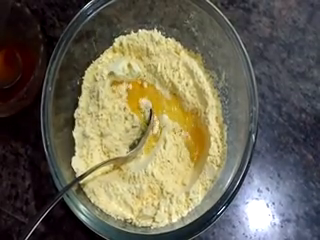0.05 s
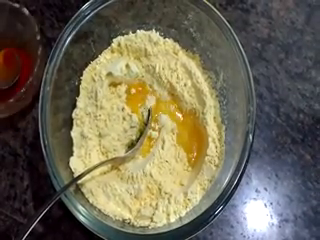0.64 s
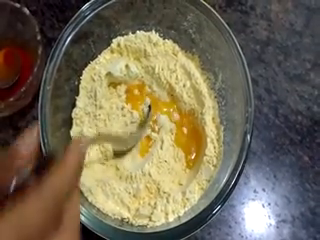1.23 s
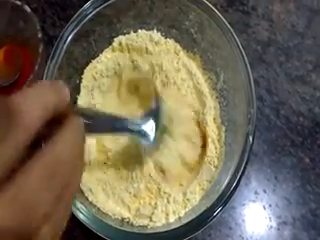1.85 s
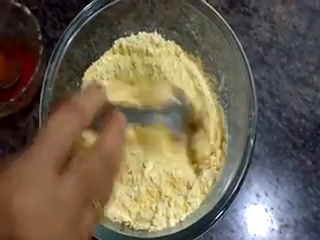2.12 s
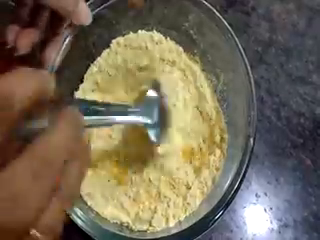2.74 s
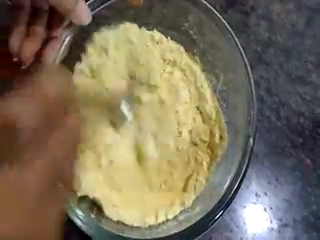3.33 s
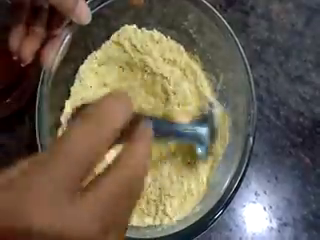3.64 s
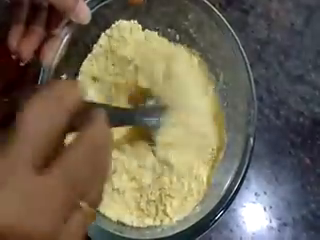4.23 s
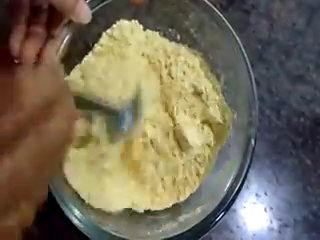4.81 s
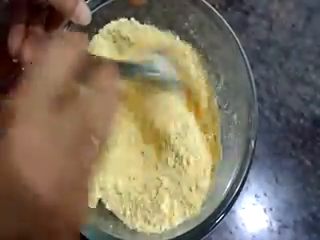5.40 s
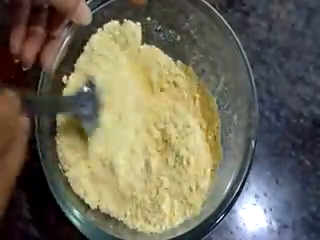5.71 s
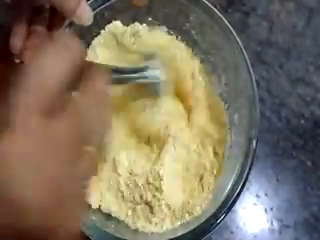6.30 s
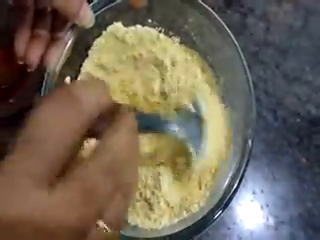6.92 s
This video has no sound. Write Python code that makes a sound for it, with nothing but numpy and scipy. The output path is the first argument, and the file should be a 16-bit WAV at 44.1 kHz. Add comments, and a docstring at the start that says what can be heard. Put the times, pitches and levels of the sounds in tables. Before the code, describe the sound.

A metal spoon stirs flour in a glass bowl with soft scraping and dull knocks, while thin bright clinks, like bangles, follow along.

```python
"""Stirring flour in a glass bowl

A small glass dish is set on a stone counter and rings in its free modes. A steel spoon stirs oil into
flour: friction makes a rub and a hiss, and about once a turn the spoon knocks the powder-damped bowl.
Thin bright clinks, likely bangles on the cook's wrist, follow the arm over quiet room noise.
The small kitchen reverberates, and a phone close by hears it all through two ports."""
import sys
import numpy as np
from scipy import signal
from scipy.fft import rfft, irfft
from scipy.io import wavfile
from scipy.ndimage import uniform_filter1d

SR = 44100
rng = np.random.default_rng(int(sys.argv[2]) if len(sys.argv) > 2 else 0)


def write(x):
    x = np.atleast_2d(x).T
    wavfile.write(sys.argv[1], SR, np.round(np.clip(x, -1, 1) * 32767).astype(np.int16))


N = 315315

# spectra of the room noise and its rumble: (frequency [Hz], level [dB])
AIR_SPECTRUM = [(15, -71), (25, -30), (219, -1), (749, -6), (1810, -13), (2430, -17), (3440, -14.5),
                (7480, -27), (9020, -24.5), (10300, -25), (15000, -33.5)]
RUMBLE_SPECTRUM = [(15, -23), (30, 8.5), (60, -28), (90, -19), (200, -84), (2000, -100)]

# clear touches of the bangles: (time [s], relative level [dB], 9 kHz ring weight [dB],
# sparkle above 12 kHz [dB], 4.6 kHz lift [dB], lean of the 9 kHz pair to its lower mode [dB])
CLINKS = [(0.226, -43, -8, 5.5, 4, 0), (0.2886, -36.5, -3, 2, 4, -2), (0.309, -38, -12, 10, 0, 0),
          (0.375, -27.5, -2, 9, -3, 2), (0.4856, -18.5, -15.5, -2, 4, 3), (0.8737, -29.5, -14, 5, 5, -15),
          (1.775, -15.5, -19, 5, 10, -12), (1.7874, -20, -8, -10, 1, -15), (1.961, -35.5, -24.5, 0, 0, 0),
          (2.081, -36, -20, 4, 0, 0), (2.104, -23, -10, 17, 1, 10), (2.1191, -16.5, -12, 4, 12, 5),
          (2.7135, -30, -15, 0, -10, 5), (2.9241, -27.5, -20, 4, 2, -5), (2.935, -26, -18, 0, 0, -5),
          (2.9438, -16, -23, 1, -4, -10), (3.238, -31, -19, 1, -3, 8), (3.276, -29, -18, 5, -7, 3),
          (3.4425, -23.5, -38, 1, -5, 0), (3.4755, -29.5, -23, -2, -3, -2), (3.7336, -18, -5.5, 12, 7, -2),
          (4.0494, -28.5, -9, -1, 10, 4), (4.219, -31, -23, -3, 12, -5), (4.3932, -33.5, -15, 1, 0, 7),
          (4.583, -20, -11.5, 13, 4, -9), (4.59, -22.5, -19, 2, -4, 1), (4.627, -15, -27, 0, -8, -12),
          (4.633, -23, -9, 6, 6, -13), (5.1209, -17, -5.5, 3, 5, 5), (5.466, -34.5, -18, 0, 0, 2),
          (5.519, -18, -11.5, 13, 0, -11), (5.5694, -33.5, -13, 1, 14, 10), (5.75, -37.5, -16, -3, -2, 5),
          (5.9471, -20.5, -20, 5, 6, 6), (5.9588, -18.5, -9, 4, 5, 8), (5.9845, -17.5, -6, 9, -6, -4),
          (6.01, -30, -3, 0, -4, 2), (6.103, -41, -36, -10, 0, -2), (6.2088, -26.5, -12, 6, 9, -6),
          (6.235, -37, -23, 0, 0, -2), (6.536, -45, -17, 0, 0, -4), (6.5648, -22.5, -2, 9, 2, 0),
          (6.575, -22.5, 4, 10, 22, 14), (6.6618, -37, -18, -6, -4, 11), (6.8425, -34, -18, 0, 0, -2),
          (6.8584, -22, -26, 0, -5, 11), (7.0499, -22, -20, 3, -7, 1)]
# the bangles' thin ring: (frequency [Hz], level [dB], t60 [s])
BANGLE_MODES = [(3100, -8, .018), (3500, -9, .02), (4625, -8.5, .085), (4800, -11, .025),
                (5850, -9.5, .035), (8838, -2, .08), (9210, -2.5, .085), (10400, -13, .025),
                (11300, -12, .03), (13300, -11, .03), (14165, -8, .055), (14740, -3, .045),
                (14900, -8, .03)]
# the crack of a hard contact: (frequency [Hz], level [dB])
CRACK_SPECTRUM = [(1800, -42), (2900, -4), (4700, 10.5), (6300, 4.5), (7500, -0.5), (9200, 9),
                  (10500, -2.5), (13000, -3), (14800, 4), (16000, -12)]
# the bangles slide down the wrist: (start [s], end [s], peak level [dB])
JANGLES = [(2.07, 2.117, -32), (2.171, 2.228, -44), (3.366, 3.456, -37.5), (5.064, 5.11, -30.5),
           (5.471, 5.501, -37), (5.911, 5.938, -45), (5.957, 5.971, -30.5)]

# spectra of the spoon's rub, the powder's hiss and the grit: (frequency [Hz], level [dB])
RUB_SPECTRUM = [(35, -39), (60, 9.5), (108, -13.5), (136, 2), (167, -4.5), (386, -1.5), (496, -4.5),
                (760, -4.5), (797, -4.5), (1060, -6.5), (1430, -18.5), (1620, -14), (2120, -16),
                (2400, -17), (2600, -30), (3380, -76), (5720, -120)]
HISS_SPECTRUM = [(1500, 1), (2800, 1.5), (3500, 2), (4200, -7.5), (4650, 4.5), (5500, -1), (7000, -12),
                 (10000, -21)]
GRIT_SPECTRUM = [(5000, -33), (7500, -4), (9200, -6), (10500, -6), (13000, -18), (14700, -7.5),
                 (16000, -35)]
# how hard the spoon is pushed: (time [s], effort [dB])
EFFORT = [(0.6, -57.5), (0.98, -51), (1.2, -46.5), (1.62, -48), (1.8, -50.5), (2.41, -50.5), (2.71, -47.5),
          (3.17, -47), (3.54, -42.5), (3.72, -47), (3.92, -47), (4.34, -46.5), (4.43, -43.5), (4.6, -47.5),
          (4.98, -48), (5.11, -57), (5.42, -54.5), (6.22, -55.5), (6.87, -46.5), (7.15, -45.5)]
# the spoon ploughs into dry flour, or the dish drags: (start [s], end [s], hiss level [dB])
PLOUGHS = [(0.384, 0.547, -41.5), (1.3, 1.77, -43), (1.96, 2.216, -46.5), (3.303, 3.463, -44.5),
           (3.535, 3.724, -46), (3.998, 4.18, -56)]
# sliding glass or metal sings: (start [s], end [s], frequency [Hz], bandwidth [Hz], level [dB])
SINGING_SLIDES = [(0.404, 0.445, 3600, 150, -53), (1.24, 1.987, 4580, 80, -49.5),
                  (2.15, 2.247, 3450, 300, -54), (3.369, 3.463, 8750, 1200, -49)]

# the dish lands, rocks and settles: (time [s], relative level [dB], body weight [dB],
# treble weight [dB], clack level [dB], share of edge contact [0-1])
DISH_HITS = [(0.453, -12, -23, -6, 8, 0), (0.476, -32, -25, -31, 15, 0.8), (0.486, -18.5, -51, -0.5, 2, 1)]
# the dish's ring: (frequency [Hz], level [dB], t60 [s], change on edge contact [dB])
DISH_MODES = [(261, 2, .2, 0), (312, -3, .08, 0), (440, 3, .18, 0), (735, 12, .25, -1), (980, -8, .2, 0),
              (1085, 5, .1, -2), (1140, 6, .24, 0), (1168, -3, .22, 0), (1448, 5, .23, 0),
              (1485, -2, .17, 0), (2105, -6, .1, -4), (2966, -11, .15, -3), (3640, -15, .23, 2),
              (3665, -12, .26, 2), (3698, -9.5, .25, 2), (3715, -4, .045, 5), (4646, -22, .17, 10),
              (5210, -3, .065, -18), (7520, -14, .04, -2), (9631, -10, .08, -1), (11860, -19, .08, 0),
              (15400, -15, .08, 0)]
# the clack of its landing: (frequency [Hz], level [dB])
CLACK_SPECTRUM = [(100, -32), (300, 13), (1100, 23.5), (2200, 1.5), (3000, -6), (5000, -20), (7000, -16),
                  (15000, -12)]

# the spoon knocks the bowl: (time [s], relative level [dB], body weight [dB], hardness [dB],
# relative tick level [dB], ping level [dB], crush share [dB], thud pitch [Hz], body pitch [Hz])
KNOCKS = [(1.273, -31.5, -31, 10, -45, -67, -39, 920, 300),
          (1.296, -13, -23, -6.5, -19.5, -26, -34, 940, 320),
          (1.703, -15.5, -19, -17.5, -31.5, -41, -13, 824, 300),
          (2.069, -30, 3, -17, -46, -62, -11.5, 840, 300),
          (2.516, -14, -15, -21.5, -37.5, -38, -18, 863, 283),
          (2.889, -26.5, -16, -12, -31, -39.5, -23, 890, 293),
          (2.902, -25, -18, -9.5, -33, -40, -20, 895, 295),
          (3.338, -11, -13, -23.5, -28.5, -57, -19.5, 845, 280),
          (4.166, -8, -15, -23, -32, -31.5, -25.5, 848, 358),
          (4.882, -31.5, -12, -35, -42, -70, -34, 790, 300),
          (5.024, -10, -27, -15.5, -26.5, -34, -16, 854, 345),
          (5.859, -25.5, -9.5, -27, -34.5, -47.5, -15, 885, 296),
          (6.713, -32, -7, -28, -45, -50, -14, 825, 294), (6.73, -30.5, -3, -28, -58, -65, -32, 790, 295)]
# the damped bowl at its usual load of flour: (frequency [Hz], level [dB], t60 [s])
BOWL_MODES = [(140.6, -13, 0.33), (182, -8.5, 0.067), (285, 7.5, 0.016), (402, 3.5, 0.014),
              (732, -17, 0.081), (823, -15, 0.047), (873, 13.5, 0.01), (1040, -17.5, 0.026),
              (1777, 9.5, 0.015), (2680, 20, 0.006), (3130, -24, 0.0071), (3430, 12, 0.0078),
              (4300, 0, 0.0021)]
# the glass wall struck by bare steel: (frequency [Hz], level [dB], t60 [s])
WALL_MODES = [(2900, -17, 0.024), (3104, 19, 0.023), (3440, -17, 0.022)]
# flour crushed under the spoon: (frequency [Hz], level [dB])
CRUSH_SPECTRUM = [(105, -36), (150, -4.5), (210, -4.5), (350, -5), (550, -2.5), (770, -2.5), (1200, -6.5),
                  (1500, -12), (1800, -7.5), (2300, -23), (5000, -49), (10000, -39.5)]

# the kitchen's reverberation: (frequency [Hz], t60 [s])
ROOM_T60 = [(130, 0.39), (400, 0.31), (1000, 0.2), (4000, 0.26), (14000, 0.3)]
# likeness of the room's sound at the two ports: (frequency [Hz], coherence [0-1])
ROOM_COHERENCE = [(60, 0.6), (200, 1), (500, 0.86), (1000, 0.92), (1750, 0.48), (2300, 1), (3200, 0.8),
                  (8000, 0), (15000, 0)]
# the phone's stereo widening: (frequency [Hz], extra lag on the right [rad], left minus right [dB])
WIDENING = [(80, 1.34, -0.5), (300, 1.22, 0.5), (760, 0.9, -2.5), (1490, -0.0028, -1.5), (1840, 0.58, -3),
            (2090, 0.19, -2), (4170, 0.48, -0.5), (6850, 0.23, -1.5), (10200, -0.29, 0),
            (12300, 1.25, -3.5)]

PORT_LAG_S, TOP_HZ = .000388, 15700
USUAL_TOUCH_DB, CHATTER_S, CHATTER_SLOPE = -33.5, .0064, .61  # slope: dB of duration per dB of touch
CRACK_S, WRIST_DAMP_S = .0014, .078  # decay time constants
JANGLE_PER_S, JANGLE_RISE_DB = 280, 20
STRAY_PER_S, STRAY_MAX_DB = 2.3, -59.5  # faint chance touches of the bangles
STIR_START_S, STIR_FADE_S, PLOUGH_RELEASE_S = .25, .21, .014
USUAL_EFFORT_DB, RUB_DB, HISS_DB, GRIT_DB = -48.5, -48, -58.5, -68  # the three levels at that effort
THUD_HZ, BODY_HZ = 860, 292  # the bowl's pitches at its usual load


def undb(db):
    """Amplitude ratio of a level in decibels."""
    return 10 ** (np.asarray(db) / 20)


def unit(x):
    """Normalisation to an rms of 1."""
    return x / np.sqrt(np.mean(x ** 2))


def on_log(hz, points):
    """Interpolation of (frequency, value) points on a log-frequency axis."""
    f, value = np.transpose(points)
    return np.interp(np.log(np.maximum(hz, 1)), np.log(f), value)


def freqs(x):
    """Frequencies of the Fourier bins of x."""
    return np.fft.rfftfreq(x.shape[-1], 1 / SR)


def colour(x, spectrum):
    """Zero-phase filtering by a (frequency, level) spectrum."""
    return irfft(rfft(x) * undb(on_log(freqs(x), spectrum)), x.shape[-1])


def wander(per_s):
    """Random modulation with a standard deviation near 1."""
    position = np.arange(N) / SR * per_s
    return 1.2 * np.interp(position, np.arange(2000), rng.standard_normal(2000))


def add(track, s, sound):
    """Superposition of a sound on the track at time s."""
    i = max(int(s * SR), 0)
    track[i:i + len(sound)] += sound[:N - i]


def at_peak(x, db):
    """Normalisation of the loudest 4 ms to an rms level."""
    return x * undb(db) / np.sqrt(uniform_filter1d(x ** 2, size=176, mode="constant").max())


def bell(x, hz, width_hz, db):
    """Second-order resonance: a bell-shaped boost or dip."""
    w, a = 2 * np.pi * hz / SR, undb(db / 2)
    q = np.sin(w) * width_hz / hz / 2
    return signal.lfilter([1 + q * a, -2 * np.cos(w), 1 - q * a],
                          [1 + q / a, -2 * np.cos(w), 1 - q / a], x)


def tint(x, low_hz, high_hz, db):
    """Band emphasis centred on the geometric mean of the edges."""
    return bell(x, np.sqrt(low_hz * high_hz), high_hz - low_hz, db)


def partials(modes, t, scatter_db, detune):
    """Free vibration: one damped sine a mode, scattered in level and pitch at each blow."""
    hz, db, t60 = np.transpose(modes)[:, :, None]
    weight, shift = rng.standard_normal((2, len(modes), 1))
    envelope = undb(db + scatter_db * weight - 60 * t / t60)
    return envelope * np.sin(2 * np.pi * hz * (1 + detune * shift) * t)


def diffuse(size):
    """Diffuse field: noise from all sides is only partly coherent at the two ports."""
    mid, side = rng.standard_normal((2, size))
    coherence = np.clip(on_log(freqs(mid), ROOM_COHERENCE), 0, 1)
    mid = irfft(rfft(mid) * np.sqrt(1 + coherence), size)
    side = irfft(rfft(side) * np.sqrt(1 - coherence), size)
    return np.array([mid + side, mid - side]) / np.sqrt(2)


def kitchen(x, wet_db, early_db, early_s, pan_db):
    """Reverberation: direct sound, early reflections off counter and wall, then an exponential tail."""
    t = np.arange(SR // 2) / SR
    noise, tail = diffuse(len(t)), 0
    for k, (_, t60) in enumerate(ROOM_T60):
        band = on_log(freqs(t), [(row[0], j == k) for j, row in enumerate(ROOM_T60)])
        tail = tail + irfft(rfft(noise) * band, len(t)) * undb(-60 * t / t60)
    early = noise * np.exp(-t / early_s)
    onset = np.clip(t / .002 - 1, 0, 1)
    echoes = (undb(wet_db) * tail + undb(early_db) * early) * onset / np.sqrt(.02 * SR)
    direct = x * undb([[pan_db / 2], [-pan_db / 2]])
    return direct + signal.fftconvolve(x[None], echoes, axes=1)[:, :N]


def room_noise():
    """Ambient field: quiet diffuse noise, wavering in level, over a low rumble."""
    rumble = unit(colour(diffuse(N), RUMBLE_SPECTRUM)) * signal.windows.tukey(N, .03)
    air = unit(colour(diffuse(N), AIR_SPECTRUM))
    return air * undb(-56 + 3.7 * wander(per_s=5.2)) + undb(-37.5) * rumble


def rim_contacts(contacts, t, ring_db, ping_db=0, lean_db=0):
    """Impulse excitation: each contact of the rims cracks and drives modes that the wrist damps."""
    pulse_power = np.exp(-2 * t / CRACK_S) * (1 - np.exp(-t / .00045))
    force = np.sqrt(np.abs(signal.fftconvolve(contacts ** 2, pulse_power)))
    crack = force * unit(colour(rng.standard_normal(SR // 2), CRACK_SPECTRUM))[:len(force)]
    damp_s = WRIST_DAMP_S * undb(2 * rng.standard_normal())
    weights = [(3500, 0), (4625, ping_db), (4800, 0), (5850, 0),
               (8838, lean_db / 2), (9210, -lean_db / 2), (10400, 0)]
    modes = [(hz, db + on_log(hz, weights), t60) for hz, db, t60 in BANGLE_MODES]
    free = partials(modes, t, scatter_db=1.5, detune=.0025) * np.exp(-t / damp_s)
    driven = signal.fftconvolve(contacts[None], free, axes=1)
    # the contacts' energies add up in each mode
    share = np.sqrt(np.sum(contacts ** 2) * np.sum(free ** 2, axis=1) / np.sum(driven ** 2, axis=1))
    sound = undb(14) * crack + undb(-.5) * (share @ driven)
    sound = tint(sound, 3000, 6500, db=-3)
    return tint(sound, 8500, 9700, db=.94 * (ring_db + 13.5))


def clink(db, ring_db, sparkle_db, t, ping_db=0, lean_db=0):
    """Rebound: the rims touch and re-touch; a light touch is one dry tick, a hard one chatters."""
    chatter_s = min(CHATTER_S * undb(CHATTER_SLOPE * (db - USUAL_TOUCH_DB)), .05)
    contacts = np.zeros(len(t))
    contacts[0] = 1
    for when, size in rng.random((5, 2)):
        contacts[int(when * chatter_s * SR)] += .8 * size * np.exp(-when)
    sound = rim_contacts(contacts, t, ring_db, ping_db, lean_db)
    return at_peak(tint(sound, 12500, 16500, sparkle_db), db)


def jangle(length_s, t):
    """Sliding contact: a rasp of small uneven impacts, louder as the bangles gather speed."""
    progress = np.linspace(0, 1, int(length_s * SR))
    contacts = np.zeros(len(progress))
    for when, size in rng.random((200, 2))[:int(length_s * JANGLE_PER_S)]:
        contacts[int(when * len(progress))] = undb(-17 * size)
    return rim_contacts(contacts * undb(JANGLE_RISE_DB * (progress - 1)), t, ring_db=-19.5)


def bangles():
    """Colliding rings: they clink as the arm turns, jangle as they slide and touch faintly between."""
    out, t = np.zeros(N), np.arange(SR // 8) / SR
    for s, db, ring_db, sparkle_db, ping_db, lean_db in CLINKS:
        add(out, s, clink(db - 8.5, ring_db, sparkle_db, t, ping_db, lean_db))
    for start, end, db in JANGLES:
        add(out, start, at_peak(jangle(end - start, t), db))
    for k, (when, softness) in enumerate(rng.random((int(STRAY_PER_S * N / SR), 2))):
        stray = clink(STRAY_MAX_DB - 9 * softness, ring_db=4, sparkle_db=-3, t=t)
        add(out, (k + when) / STRAY_PER_S, stray)
    return kitchen(out, wet_db=-15, early_db=-1, early_s=.009, pan_db=3.5)


def friction(spectrum, grain_db, flutter_db):
    """Stick-slip friction: countless tiny slips of uneven size, coming in quick surges."""
    slips = rng.standard_normal(N) * undb(grain_db * wander(per_s=260))
    surges = undb(flutter_db * wander(per_s=28))
    return unit(colour(slips * surges, spectrum))


def stirring():
    """Friction noise grows with effort: the spoon rubs, powder hisses, grit catches on the glass."""
    t = np.arange(N) / SR
    push_db = np.interp(t, *np.transpose(EFFORT)) - USUAL_EFFORT_DB
    plough = ploughing(t)
    fade_in = np.clip((t - STIR_START_S) / STIR_FADE_S, 0, 1)
    rub = friction(RUB_SPECTRUM, grain_db=0, flutter_db=1.9) * fade_in * undb(RUB_DB + .95 * push_db)
    rub = bell(rub, hz=127, width_hz=30, db=4.4)  # the bowl's low boom on the counter
    rub = bell(rub, hz=753.3, width_hz=25.5, db=7.9)  # its lowest wall mode
    rub = bell(rub, hz=1594, width_hz=44, db=2.2)  # and the next one
    hiss_gain = np.hypot(fade_in * undb(HISS_DB + 1.15 * push_db), plough)
    hiss = friction(HISS_SPECTRUM, grain_db=2, flutter_db=.8) * hiss_gain
    hiss = bell(hiss, hz=4590, width_hz=85, db=2.5)  # powder keeps the spoon's blade faintly ringing
    grit_gain = np.hypot(fade_in * undb(GRIT_DB + push_db), undb(-18.5) * plough)
    grit = friction(GRIT_SPECTRUM, grain_db=4, flutter_db=-1) * grit_gain
    return kitchen(rub + hiss + singing() + grit, wet_db=-7, early_db=-40, early_s=.0072, pan_db=.5)


def ploughing(t):
    """Loading and release: the hiss envelope swells as flour piles up, and dies as the spoon breaks free."""
    gain = np.zeros(N)
    for start, end, db in PLOUGHS:
        swell = np.clip((t - start) / (end - start), 0, 1)
        release = np.exp(-np.maximum(t - end, 0) / PLOUGH_RELEASE_S)
        gain += undb(db) * swell * release
    return gain


def singing():
    """Friction-driven resonance: rubbing feeds a single mode for a moment, so it swells and fades."""
    out = np.zeros(N)
    for start, end, hz, width_hz, db in SINGING_SLIDES:
        size = int((end - start) * SR)
        resonator = signal.iirpeak(hz, hz / width_hz, fs=SR)
        tone = unit(signal.lfilter(*resonator, rng.standard_normal(N))[:size])
        add(out, start, undb(db) * tone * np.sin(np.linspace(0, np.pi, size)))
    return out


def dish():
    """Hard impact: bare glass on stone gives a short clack, then rings in its free modes."""
    out, t = np.zeros(N), np.arange(SR // 2) / SR
    clack_decay = np.exp(-t / .011) + np.exp(-t / .004)
    for s, db, body_db, treble_db, clack_db, edge in DISH_HITS:
        modes = [(hz, gain + edge * edge_db, t60) for hz, gain, t60, edge_db in DISH_MODES]
        clack = colour(rng.standard_normal(len(t)), CLACK_SPECTRUM) * clack_decay
        ring = partials(modes, t, scatter_db=.7, detune=.0005).sum(axis=0)
        sound = tint(ring + undb(clack_db) * clack, 210, 470, db=.5 * (body_db + 18))
        sound = tint(sound, 3000, 12000, db=treble_db + 18.5)
        add(out, s, at_peak(sound, db - 3.5))
    return kitchen(out, wet_db=-4, early_db=-10, early_s=.0046, pan_db=3)


def bowl_knocks():
    """Damping and mass loading: flour deadens and retunes each thud; powder crushes, bare steel ticks."""
    out, t = np.zeros(N), np.arange(SR // 4) / SR
    bass_cut = signal.butter(4, 178, "high", fs=SR)  # the thud carries little deep bass
    for s, db, body_db, hard_db, tick_db, ping_db, crush_db, thud_hz, body_hz in KNOCKS:
        contact = [(150, .5 * body_db + 5.5), (300, body_db + 12.5), (700, 0), (1100, 0),
                   (1800, hard_db + 6.5), (3000, hard_db - .5)]
        body_ratio, thud_ratio = body_hz / BODY_HZ, thud_hz / THUD_HZ
        load = [(190, 1), (280, body_ratio), (430, body_ratio), (760, 1),
                (850, thud_ratio), (1100, thud_ratio), (1700, 1)]
        modes = [(hz * on_log(hz, load), gain + on_log(hz, contact), t60) for hz, gain, t60 in BOWL_MODES]
        thud = partials(modes, t, scatter_db=1.2, detune=.01).sum(axis=0)
        thud = signal.lfilter(*bass_cut, thud * (1 - np.exp(-t / .0017)))
        crush = unit(colour(rng.standard_normal(len(t)), CRUSH_SPECTRUM))
        crush *= np.exp(-t / .041) * (1 - np.exp(-t / .00034))
        crack = colour(rng.standard_normal(len(t)), CRACK_SPECTRUM)
        tick = tint(crack, 3000, 6500, db=1) * np.exp(-t / .0046)
        ping = partials(WALL_MODES, t, scatter_db=2, detune=.01).sum(axis=0)
        steel = at_peak(tick, tick_db - 13.5) + at_peak(ping, ping_db)
        add(out, s, at_peak(thud, db - 4) + undb(db + crush_db) * crush + steel)
    return kitchen(out, wet_db=-8.5, early_db=-17, early_s=.023, pan_db=3)


def scene():
    """Superposition: the pressures of all sources add at each port."""
    return dish() + bowl_knocks() + bangles() + stirring() + room_noise()


def record(dry):
    """Phase widening: the phone delays and inverts its right channel, then limits the band of both."""
    hz = freqs(dry)
    turn, balance_db = (on_log(hz, np.array(WIDENING)[:, [0, k]]) for k in (1, 2))
    phase = 2 * np.pi * hz * PORT_LAG_S - np.pi + turn
    response = np.array([undb(balance_db / 2), undb(-balance_db / 2) * np.exp(-1j * phase)])
    wide = irfft(rfft(dry) * response, N)
    wide = bell(wide, hz=2500, width_hz=200, db=-1.6)
    wide = signal.sosfilt(signal.butter(4, 112, "high", fs=SR, output="sos"), wide)
    return signal.sosfilt(signal.ellip(8, .2, 70, TOP_HZ, fs=SR, output="sos"), wide)


dry = scene()
out = record(dry)
write(out)
```